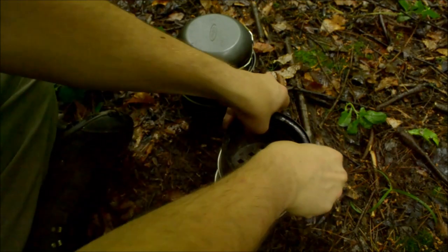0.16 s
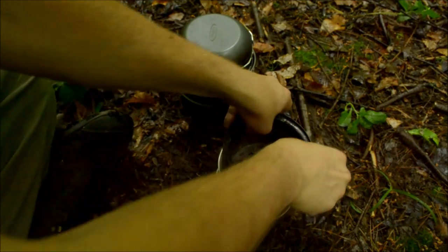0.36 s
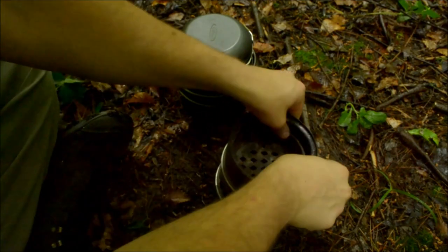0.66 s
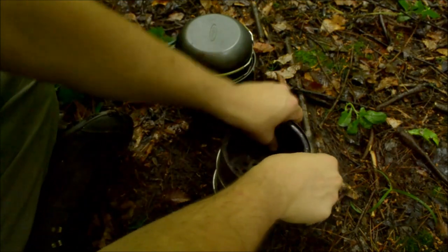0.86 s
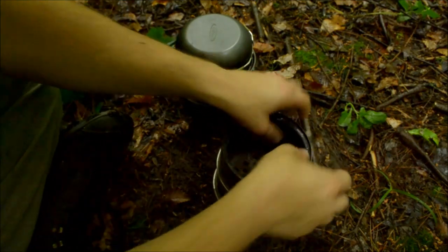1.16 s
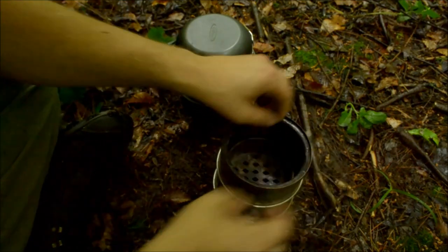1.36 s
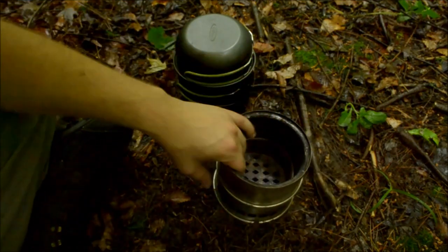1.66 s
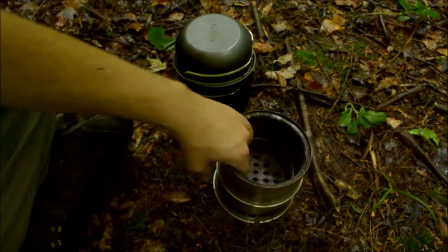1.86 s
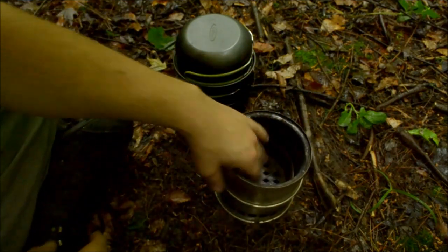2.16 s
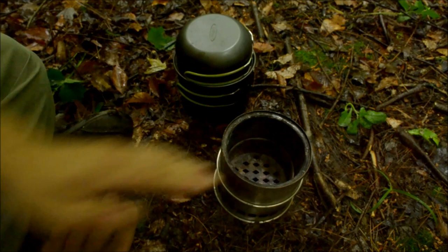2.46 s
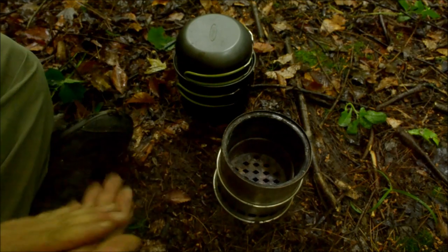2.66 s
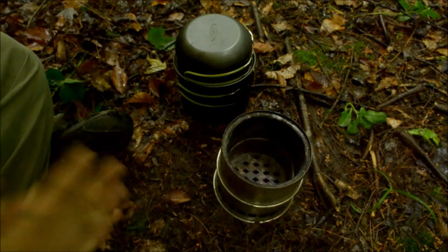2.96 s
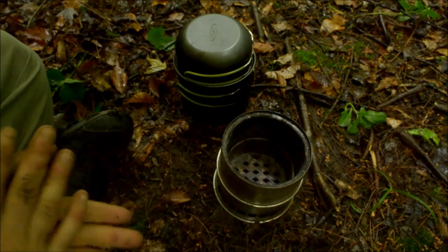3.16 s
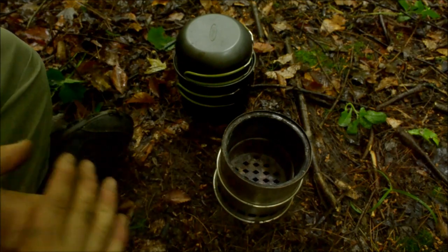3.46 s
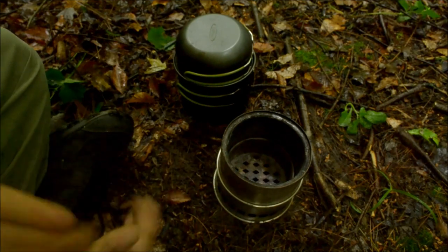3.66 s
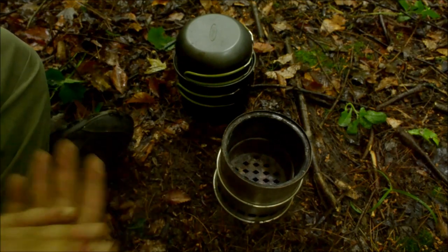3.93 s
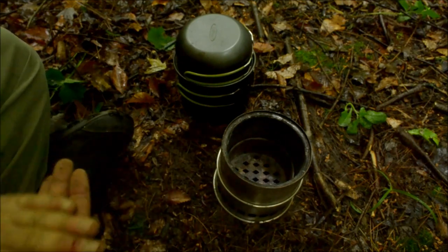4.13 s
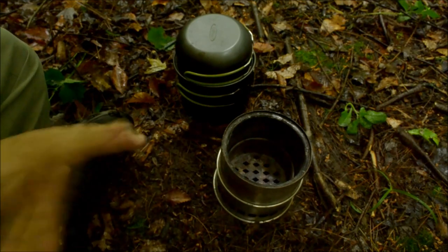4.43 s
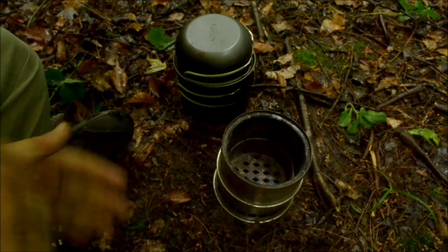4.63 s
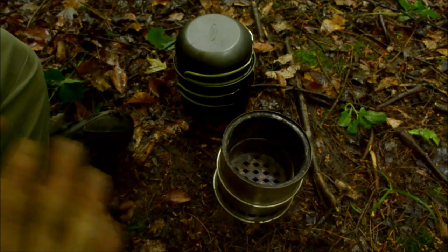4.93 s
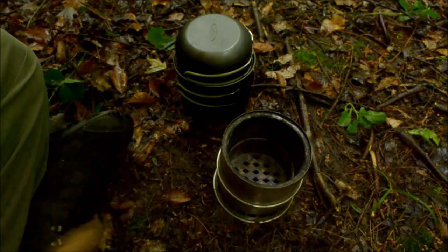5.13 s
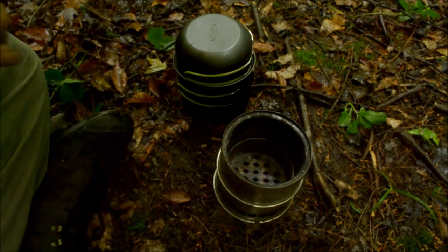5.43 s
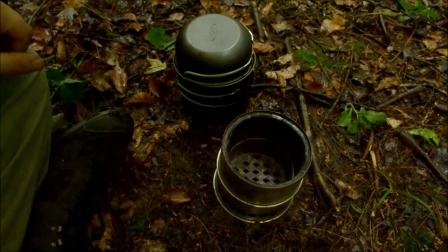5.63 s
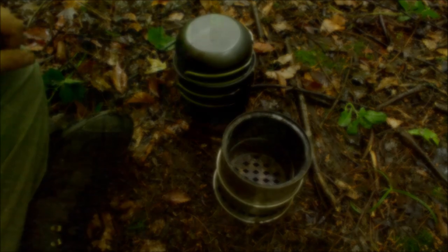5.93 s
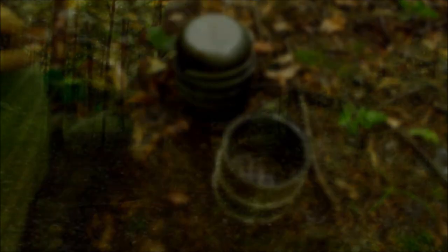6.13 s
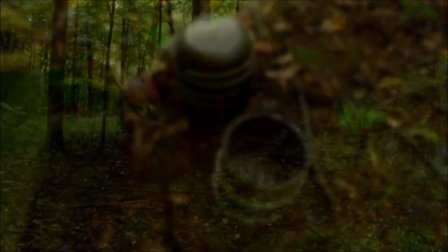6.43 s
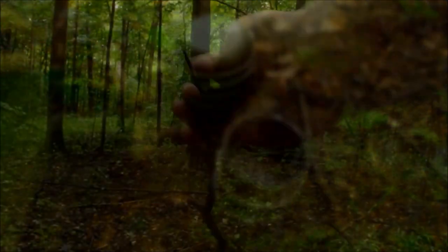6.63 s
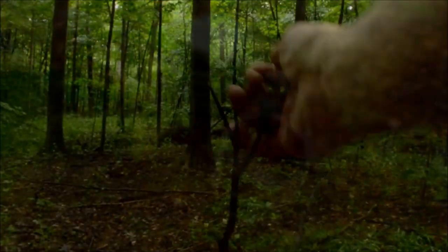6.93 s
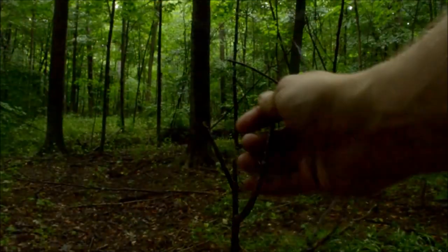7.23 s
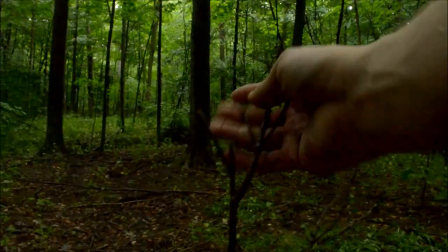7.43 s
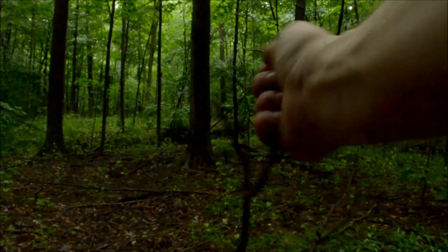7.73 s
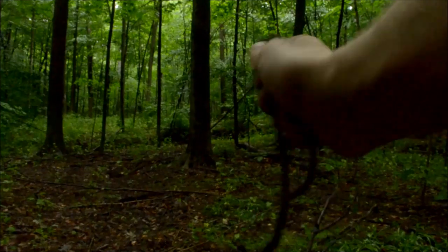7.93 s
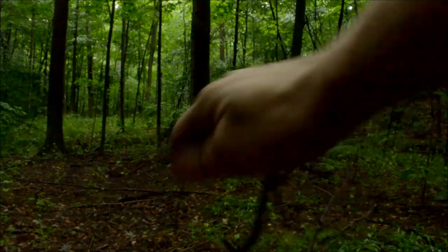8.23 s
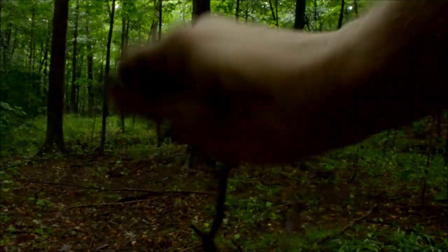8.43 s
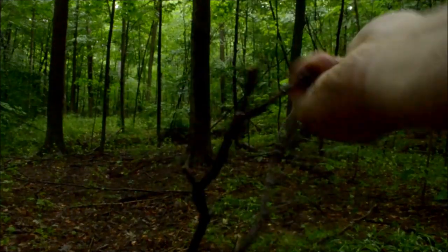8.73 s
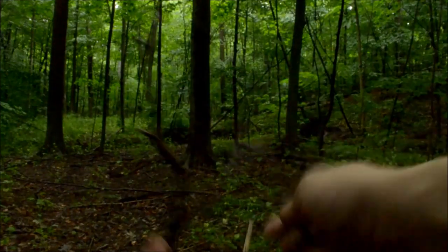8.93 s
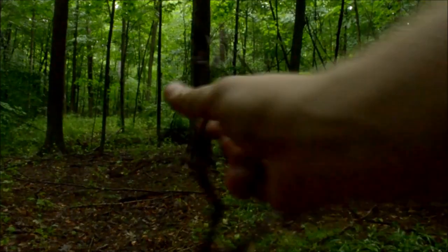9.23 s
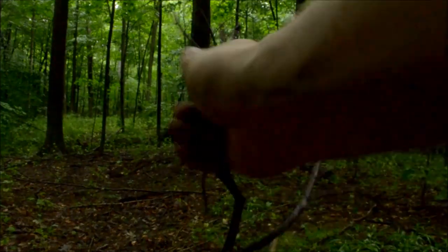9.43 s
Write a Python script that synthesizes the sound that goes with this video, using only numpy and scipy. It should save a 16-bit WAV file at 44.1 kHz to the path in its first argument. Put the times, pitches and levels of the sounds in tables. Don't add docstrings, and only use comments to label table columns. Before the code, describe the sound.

Steady rain in a wood runs throughout, a soft far hiss with fine patter, swelling slightly. At 0 s a thin steel pot gives a small knock and scrape, another knock at 0.5, then clatters from 0.76, scrapes brightly inward and lands with a hard, overloaded clank at 0.87, bouncing at 0.9. It rings clear and high until a hand stops it at 1.4; a tiny metallic tap follows at 2.0. Between 2.6 and 5.1 wet palms rub in faint hissing strokes and fat drops slap close leaves, clustering around 5 s. A moderate twig crack comes at 6.4, small snaps at 7.25, creaking snaps at 7.75, then a violent, clipped break at 8.0 and a hard second at 8.1. Fibres tick on, with a small snap at 8.6 and a woody one at 9.6.

```python
import sys
import numpy as np
from scipy import signal
from scipy.fft import rfft, irfft, next_fast_len
from scipy.io import wavfile
from scipy.ndimage import uniform_filter1d

SR = 44100
rng = np.random.default_rng(int(sys.argv[2]) if len(sys.argv) > 2 else 0)


def inscribe(sig):
    pcm = np.round(np.clip(np.atleast_2d(sig).T, -1, 1) * 32767)
    wavfile.write(sys.argv[1], SR, pcm.astype(np.int16))


def to_linear_factor(level_db):
    exponent = np.asarray(level_db, float) / 20
    return 10 ** exponent


N = 422919
TIME = np.arange(N) / SR

# [start_s, level_db]
RAIN_LEVEL = [(0, -45.5), (.32, -46.5), (.8, -43.5), (1.15, -47), (4.2, -46), (4.65, -46.5), (5.83, -46.5),
              (5.87, -43), (7.18, -43), (7.61, -46.5), (7.91, -44.5), (8.63, -45), (9.59, -44)]
# [pitch_hz, level_db per Hz]
RAIN_COLOUR = [(18, -76), (30, -21.5), (182, -11), (501, -5.5), (691, -3), (1420, -0.5), (3440, 0.5),
               (4990, -3), (7980, -17.5), (9030, -18), (11000, -19.5), (14300, -92), (22000, -120)]

# [start_s, end_s, level_db, release_db_per_s]
STROKES = [(.1, .75, -65, 16), (1.7, 2.05, -61, 35), (2.636, 2.853, -59, 72), (3.24, 3.5, -59.5, 60),
           (3.6, 3.718, -54.5, 3000), (4.068, 4.2, -56, 60), (4.41, 4.45, -57.5, 110), (4.9, 5.1, -62, 24),
           (5.9, 7.2, -66, 30), (8.012, 8.1, -57, 44), (8.75, 8.95, -66, 8)]
STROKE_RISE_DB_PER_S = 86
# [high_hz, low_hz]
PALM_BANDS = (9500, 6730)

# [start_s, spike_db, leaf_pitch_hz, rebound_db, splash_db]
FAT_DROPS = [(0.12, -16.5, 940, -4, -17.5), (2.6359, -22.5, 2650, 6.5, -16),
             (3.123, -10.5, 796, -0.5, -20.5), (3.158, -17.5, 3430, -27, -29),
             (3.3946, -21, 1350, 6.5, -12), (3.8088, -18, 680, -4, -17), (4.87, -11, 1310, -9, -19),
             (4.8753, -21.5, 1650, -5, -13), (4.9871, -11, 1440, -13, -27), (5.013, -5.5, 693, -2, -24.5),
             (5.061, -21, 1490, 6.5, -15), (5.0701, -13.5, 830, -5.5, -18.5),
             (5.3883, -14.5, 3160, -24, -24), (5.7699, -18.5, 810, -3, -16), (5.816, -20, 615, -11, -15.5),
             (6.714, -24, 1030, 3.5, -9.5), (6.8277, -10.5, 855, -9.5, -19), (7.054, -18, 836, -2.5, -16),
             (7.1117, -16, 3060, -23, -38), (7.7563, -25, 1140, -12, -7)]
# [start_s, spike_db, leaf_pitch_hz]
DRIPS = [(0.102, -27, 1440), (0.1655, -31, 2610), (0.273, -28.5, 1680), (0.3062, -35, 2280),
         (1.7442, -31, 900), (1.973, -28, 1420), (2.406, -26, 1370), (2.491, -29, 3470),
         (2.5507, -25.5, 1090), (2.66, -28, 750), (2.8836, -31.5, 1510), (2.9501, -27.5, 1770),
         (4.819, -24.5, 1250), (5.4314, -27, 1460), (5.4507, -27, 2200), (6.1894, -26, 860),
         (6.6493, -35, 1440), (6.9416, -25, 1740), (7.003, -25, 2080), (7.079, -25.5, 1610),
         (7.4871, -28, 1490), (7.915, -23, 3080), (8.433, -29, 2070), (8.7216, -26.5, 980),
         (8.7804, -25, 2950), (9.0263, -25.5, 2430), (9.2062, -28.5, 2480), (9.3637, -30.5, 846),
         (9.3927, -27.5, 1290)]
DRIP_REBOUND_DB, DRIP_SPLASH_DB, SPLASH_MS = -1.5, -18.5, 3.22

# [start_s, peak_db, ring_hz, bark_db, body_db]
SNAPS = [
    (6.4082, -16.5, 5940, -14, -13),
    (7.235, -25.5, 3200, -10, -13),
    (7.2724, -20.5, 3800, -14, -32),
    (7.7326, -16, 5660, -20, -27),
    (7.8165, -16, 5600, -19, -36),
    (8.0037, 7, 6260, -15.5, -19.5),
    (8.1207, -2.5, 5830, -8, -17),
    (8.565, -32, 9150, -15, -21),
    (8.6288, -17, 6100, -18, -23),
    (9.5753, -20.5, 4860, -4, -12),
]
# [start_s, peak_db, wood_db]
TICKS = [(0.091, -32, -11), (0.3505, -29, -6), (2.164, -34, -16), (2.4356, -32, -16), (5.3692, -44, 2),
         (5.577, -31, -11), (5.917, -34, 2), (7.649, -23.5, -19), (7.673, -36.5, 4), (7.9084, -40, 6),
         (8.154, -34.5, -2), (8.317, -36, -9), (8.575, -27.5, -9), (8.6637, -29, -19), (8.7705, -27, -12),
         (8.7903, -29.5, -16), (8.897, -39, 8), (8.9083, -30, -6), (9.001, -32, -14), (9.3028, -40, 4),
         (9.3272, -37, 8.5), (9.3787, -35, -11), (9.439, -37, 1), (9.5485, -44, 2)]
TICK_HZ, TICK_SCATTER, TICK_BODY_DB, CRACK_MS = 5400, 0.087, -4.5, 0.58
# [start_s, pitch_hz, level_db, t60_s]
THUDS = [
    (.765, 350, -38, .07),
    (2.636, 2600, -27, .03),
    (5.0135, 2800, -24, .02),
    (7.238, 3200, -33, .035),
    (7.735, 334, -33, 0.026),
    (8.005, 800, -15, .014),
]
# [start_s, level_db, width_ms]
PUFFS = [
    (.872, -19, .3),
    (8.0052, -14, .2),
]

# [start_s, peak_db, contact_hz, contact_decay_ms, treble_db]
KNOCKS = [(0.025, -16.5, 2110, 1.7, -17), (0.038, -20, 3880, 2.9, -17), (0.496, -16.5, 2420, 1.5, -20),
          (0.666, -23.5, 2400, 3.3, -4), (0.7606, -2, 1790, 3.9, -22), (0.773, 3, 2650, 0.86, -23),
          (0.807, -13, 2460, 3.7, -18), (0.834, -14.5, 5400, 4.2, -17), (0.86, -6, 3520, 3, -23),
          (0.8693, 7, 1834, 1.66, -30), (0.8795, 2, 1880, 3, -20), (0.9035, -4.5, 1650, 6.4, -35),
          (2.032, -31.5, 1740, 4.3, -5)]
# [start_s, level_db, fall_db_per_s, brightness_db]
RATTLES = [
    (0.029, -28, 660, -6.5),
    (0.495, -26, 680, -9),
    (.762, -19, 630, 0),
    (.838, -35, 1500, 0),
    (0.8721, -3.5, 1400, -9.5),
    (0.903, -16.5, 680, -7.5),
]
RATTLE_RISE_DB_PER_S = 3000
# [start_s, end_s, level_db, sag_db_per_s, brightness_db]
DRAGS = [
    (.002, 0.024, -40, -300, -25),
    (0.796, 0.856, -35.5, 15, 3.5),
    (0.94, 0.994, -31, 180, -16),
]
DRAG_EDGE_DB_PER_S, BRIGHTEN_DB_PER_S = 1500, 154
# [pitch_hz, width_hz, level_db]
DAMPED_WALL = [(926, 33, -6.5), (1420, 31, -48), (1874, 53, 8), (1933, 34, 10), (2197, 18, 4.5),
               (2620, 51, -2), (3120, 51, -2), (3880, 50, 0), (5560, 81, -11.5), (9000, 9.1, -8),
               (10900, 12, -4)]
# [pitch_hz, level_db, t60_s]
LANDING_MODES = [(890, -22, .1), (1678, -15, .09), (1420, -23, .12), (1800, -13, .07), (1927, -15, .09),
                 (2300, -16, .12), (2729, -17, .3), (2762, -7, .45), (3340, -30, .1), (3666, -27, .3),
                 (3741, -26, .3), (3871, -23, .3), (5157, -33, .3)]
# [pitch_hz, level_db, t60_s]
FREE_MODES = [(1367, -25.5, .38), (1846, -32, .29), (1906, -22.5, .55), (2196, -32, .2), (2466, -34, 1.05),
              (2729, -14, .2), (2762, -16, .35), (3228, -29, 1.6), (3666, -30, .65), (3741, -29, .4),
              (3811, -36, .3), (3871, -27, .4), (4043, -42, .9), (4344, -38, .3), (4764, -49, 1.0),
              (5152, -30, .33), (5160, -46, 1.8), (5841, -36, .3), (6379, -44, .7), (6681, -44, .4),
              (7149, -48, .8), (7768, -50, .5), (9055, -52, .35), (9631, -54, .35), (10580, -57, .7)]
# [start_s, pitch_hz, level_db, t60_s]
TAPS = [(0.028, 3800, -31, 0.14), (.027, 1995, -32, 0.059), (0.498, 2610, -15.5, 0.03),
        (0.499, 6100, -36, 0.051), (0.773, 2750, -22, 0.35), (.76, 1116, -18, 0.04), (.761, 1360, -27, .06),
        (.79, 10030, -30, .4), (.834, 4700, -39, .12), (2.032, 1726, -41, 0.14), (2.033, 8370, -45, 0.11),
        (2.032, 10050, -39, 0.11), (2.032, 10540, -38, 0.066)]
# [start_s, pitch_hz, level_db, t60_s]
LIFT = (.766, 915, -36.5, 1.5)
LAND_S, RIM_BLOW_S, BOUNCE_S = .8715, .8808, .9045
GRIP_S, GRIP_DB_PER_S = 1.39, 300

# [pitch_hz, width_hz, depth 0-1]
MIC_DIP = (7950, 400, .55)


def unit(x):
    return x / np.sqrt(np.mean(x ** 2))


def peak(x):
    return x / np.abs(x).max()


def band(x, hz, width):
    return signal.lfilter(*signal.iirpeak(min(hz, .45 * SR), hz / width, SR), x)


def highpass(x, hz):
    return signal.sosfilt(signal.butter(2, hz, "high", fs=SR, output="sos"), x)


def add(out, s, x):
    i = int(s * SR)
    out[i:i + len(x)] += x[:len(out) - i]


def walk(rate):
    hold = int(SR / rate)
    steps = np.repeat(rng.standard_normal(N // hold + 1), hold)
    return 1.5 * uniform_filter1d(uniform_filter1d(steps, hold), hold)[:N]


def envelope(t, start, end, db, rise, fall):
    return db - rise * np.maximum(start - t, 0) - fall * np.maximum(t - end, 0)


def ring(hz, t60, size, age=0.):
    t = TIME[:size]
    return np.sin(2 * np.pi * hz * (t + age)) * to_linear_factor(-60 * t / t60) * np.minimum(t / .002, 1)


def clicks(count, spread_db):
    out = np.zeros(N)
    out[rng.integers(0, N, count)] = to_linear_factor(spread_db * np.minimum(rng.exponential(size=count), 4))
    return unit(out)


def rain():
    hz, db = np.transpose(RAIN_COLOUR)
    size = next_fast_len(N)
    octave = np.log2(np.maximum(np.arange(size // 2 + 1) * SR / size, 1))
    colour = to_linear_factor(np.interp(octave, np.log2(hz), db))
    patter = clicks(count=6000, spread_db=5.5)
    swell = walk(14)
    out = 0
    for centre in np.arange(4.5, 14, .5):
        own = rng.standard_normal(N) + 0.35 * clicks(count=2500, spread_db=8.5) + 0.25 * patter
        window = np.cos(np.pi * np.clip(octave - centre, -.5, .5))
        flicker = to_linear_factor(.6 * swell + 1.0 * walk(25))
        out = out + flicker * irfft(rfft(own, size) * window * colour)[:N]
    return unit(out) * to_linear_factor(np.interp(TIME, *np.transpose(RAIN_LEVEL)))


def palms():
    grit = rng.standard_normal(N) * to_linear_factor(1.0 * walk(60))
    high, low = PALM_BANDS
    bright = band(band(grit, high, 4500), high, 4500)
    dark = band(band(grit, low, 3000), low, 3000)
    strokes = [envelope(TIME, a, b, db, STROKE_RISE_DB_PER_S, fall) for a, b, db, fall in STROKES]
    return unit(bright + 0.35 * dark) * to_linear_factor(np.max(strokes, axis=0))


def slap(hz, rebound_db, ms=12):
    t = np.arange(int(ms * SR / 1000)) / SR
    spike = -np.exp(-((t - .0002) / .00007) ** 2)
    late = np.maximum(t - .0003, 0)
    swing = np.sin(2 * np.pi * hz * late) * np.exp(-2.2 * hz * late)
    tip = np.exp(-((late - 0.38 / hz) / .00009) ** 2)
    wave = spike + to_linear_factor(rebound_db + 3.0) * swing + to_linear_factor(rebound_db - 13) * tip
    return highpass(wave, 0.26 * hz + 60)


def drops():
    out, t = np.zeros(N), np.arange(800) / SR
    drips = [(*row, DRIP_REBOUND_DB, DRIP_SPLASH_DB) for row in DRIPS]
    for s, db, hz, rebound_db, splash_db in list(FAT_DROPS) + drips:
        sparse = rng.standard_normal(800) * (rng.random(800) < .15)
        bits = sparse * np.exp(-t * 1000 / SPLASH_MS) * (t > .0006)
        bits = bits / np.sqrt(np.sum(bits ** 2) / (0.088 * SPLASH_MS * SR / 1000))
        spray = np.convolve(bits, slap(0.53 * hz + 500, 0) + slap(4700, 0))
        add(out, s - .0003, to_linear_factor(db + .8) * slap(hz, rebound_db))
        add(out, s, to_linear_factor(db + splash_db + 1.0) * spray)
    return out


def twigs():
    out, t = np.zeros(N), np.arange(1500) / SR
    pitch = TICK_HZ * (1 + TICK_SCATTER * rng.standard_normal(len(TICKS)))
    ticks = [(s, db, hz, wood_db, wood_db + TICK_BODY_DB) for (s, db, wood_db), hz in zip(TICKS, pitch)]
    fall = np.exp(-t * 1000 / CRACK_MS) + 0.1 * np.exp(-t / 0.0052)
    for s, db, hz, bark_db, body_db in list(SNAPS) + ticks:
        burst = np.sign(rng.standard_normal(1500)) * fall * np.minimum(t / 0.0001, 1)
        crack = band(band(burst, hz, 3100), hz, 4600) + 0.76 * band(band(burst, 9900, 2600), 7900, 4800)
        bark = band(band(burst, 3370, 1700), 4640, 2400)
        body = band(band(burst, 2790, 740), 2080, 1940)
        snap = peak(crack) + to_linear_factor(bark_db + 7) * peak(bark) + to_linear_factor(body_db + 8.5) * peak(body)
        add(out, s + 0.00079, to_linear_factor(db) * snap)
    for s, hz, db, t60 in THUDS:
        add(out, s - .001, to_linear_factor(db) * ring(hz, t60, size=5000))
    return out


def puffs():
    return sum(-to_linear_factor(db) * np.exp(-((TIME - s) * 1000 / ms) ** 2) for s, db, ms in PUFFS)


def pot_clatter(size):
    now, t = TIME[:size], np.arange(1500) / SR
    wall, rasp, out = np.zeros(size), np.zeros(size), np.zeros(size)
    for s, db, hz, ms, treble_db in KNOCKS:
        db = min(db, 7)
        burst = np.sign(rng.standard_normal(1500)) * np.exp(-t * 1000 / max(ms, .3)) * np.minimum(t / 0.00066, 1)
        add(wall, s, to_linear_factor(db) * 0.55 * burst)
        add(rasp, s, to_linear_factor(db + treble_db) * burst)
        contact = band(band(burst, hz, 0.084 * hz), hz, .5 * hz)
        add(out, s, to_linear_factor(db - 11) * peak(contact))
    grit = rng.standard_normal(size) * to_linear_factor(4.5 * walk(300)[:size])
    for s, db, fall, bright_db in RATTLES:
        rub = grit * to_linear_factor(envelope(now, s, s, db, RATTLE_RISE_DB_PER_S, fall))
        wall += rub
        rasp += rub * to_linear_factor(bright_db)
    for a, b, db, sag, bright_db in DRAGS:
        moved = np.clip(now - a, 0, b - a)
        level = envelope(now, a, b, db, DRAG_EDGE_DB_PER_S, DRAG_EDGE_DB_PER_S) - sag * moved
        rub = grit * to_linear_factor(level)
        wall += rub
        rasp += rub * to_linear_factor(bright_db + BRIGHTEN_DB_PER_S * moved)
    for k, (hz, width, db) in enumerate(DAMPED_WALL):
        out += 2.38 * (-1) ** k * to_linear_factor(db) * band(wall, hz, 4.8 * width)
    return out + 0.065 * band(wall, 5300, 5000) + 2.0 * band(rasp, 4900, 1280) + 0.81 * band(rasp, 10000, 2900)


def pot_ringing(size):
    out = np.zeros(size)
    held = int((BOUNCE_S - LAND_S) * SR)
    for hz, db, t60 in LANDING_MODES:
        mode = ring(hz, t60, held, LAND_S - RIM_BLOW_S)
        add(out, LAND_S, to_linear_factor(db) * mode * np.clip(np.linspace(10, 0, held), 0, 1))
    freed = BOUNCE_S - .002
    for hz, db, t60 in FREE_MODES:
        add(out, freed, to_linear_factor(db) * ring(hz, t60, 60000, freed - RIM_BLOW_S))
    out = out * to_linear_factor(-GRIP_DB_PER_S * np.maximum(TIME[:size] - GRIP_S, 0))
    for s, hz, db, t60 in TAPS:
        add(out, s, to_linear_factor(db + 1.0 * walk(105)[:9000]) * ring(hz, t60, size=9000))
    s, hz, db, t60 = LIFT
    add(out, s, to_linear_factor(db) * ring(hz, t60, size=4800) * np.clip(np.linspace(10, 0, 4800), 0, 1))
    return out


def pot():
    size = int(2.6 * SR)
    out = highpass(pot_clatter(size) + pot_ringing(size), 600)
    return np.pad(out, (0, N - size))


def scene():
    return (rain() + palms() + drops() + twigs() + puffs() + pot())[None]


def top_cut(x):
    return signal.sosfilt(signal.butter(12, 11700, fs=SR, output="sos"), x)


def record(dry):
    hz, width, depth = MIC_DIP
    x = dry - depth * band(dry, hz, width)
    x = signal.sosfilt(signal.cheby2(6, 40, 12100, fs=SR, output="sos"), x)
    return top_cut(np.clip(x, -1, 1))


dry = scene()
out = record(dry)
inscribe(out)
```